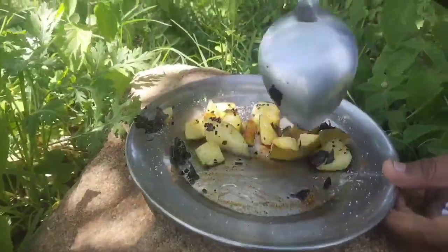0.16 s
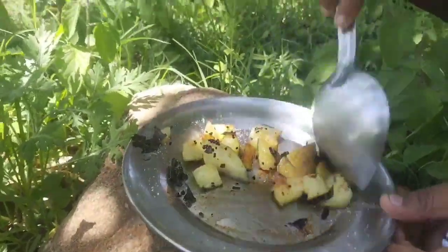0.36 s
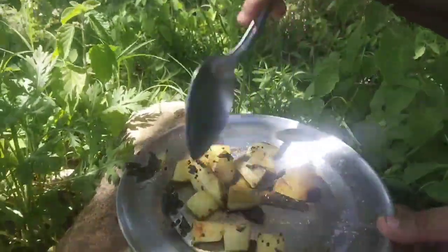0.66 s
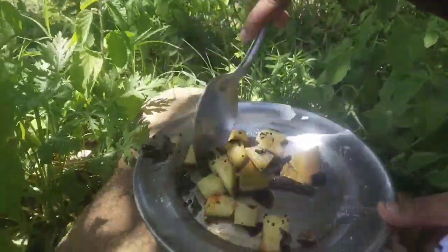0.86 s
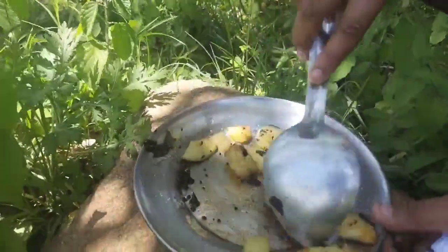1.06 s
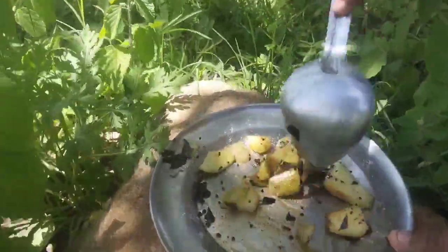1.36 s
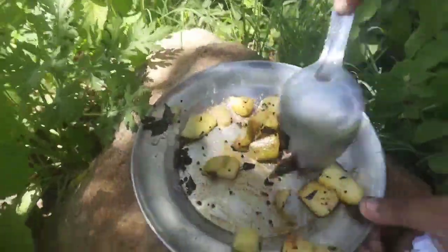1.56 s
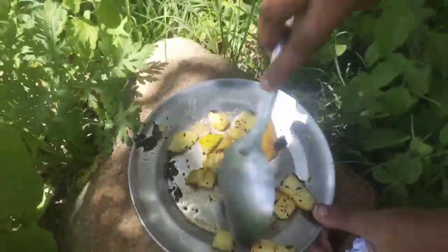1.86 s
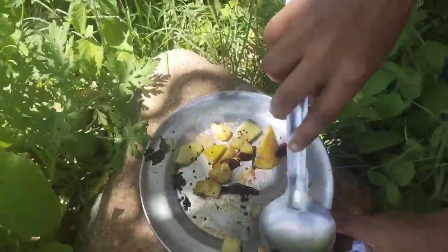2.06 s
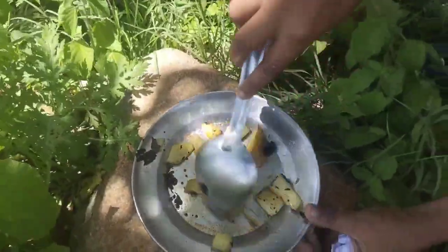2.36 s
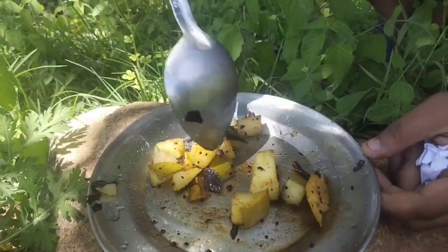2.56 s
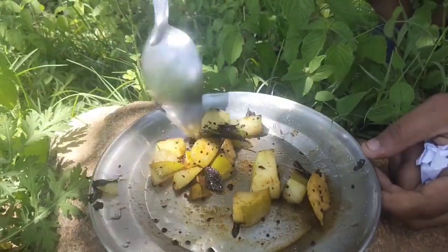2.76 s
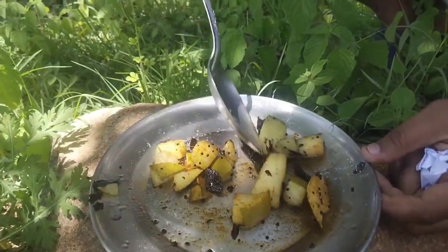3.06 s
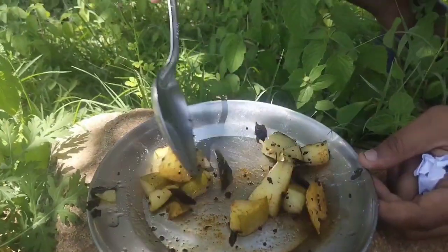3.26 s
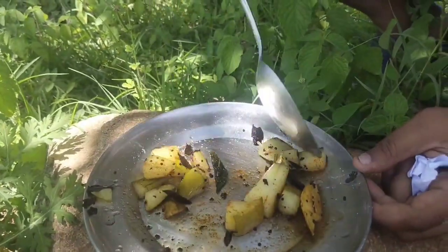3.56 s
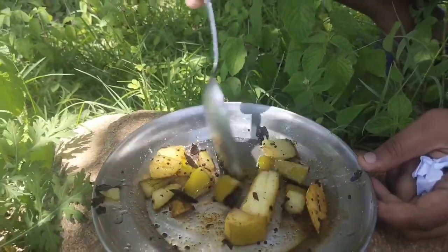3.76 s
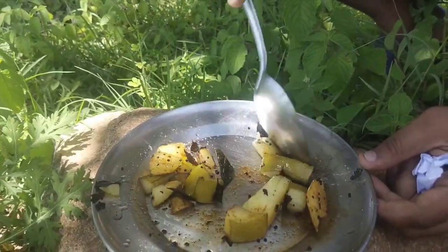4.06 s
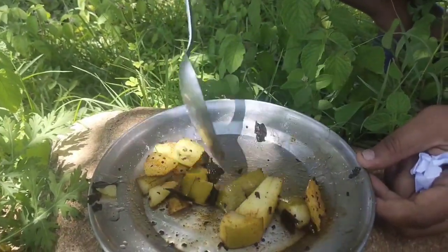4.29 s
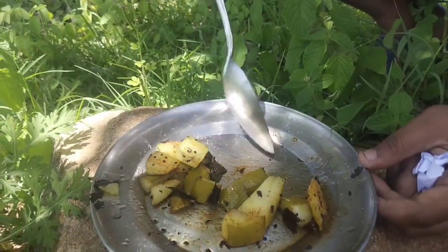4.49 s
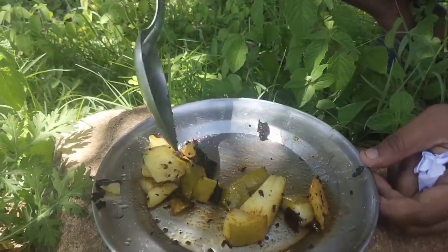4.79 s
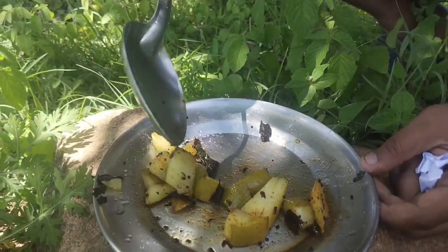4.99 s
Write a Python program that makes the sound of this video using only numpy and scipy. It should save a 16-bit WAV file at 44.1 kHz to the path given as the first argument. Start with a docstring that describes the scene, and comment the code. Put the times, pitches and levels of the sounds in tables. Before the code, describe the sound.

A metal ladle pushes cooked potato pieces onto a hand-held steel plate. An opening cluster of quick clinks and a scrape gives way to scattered knocks and rubs, then low dull bumps around two seconds and the loudest clangs just after. A longer scrape comes at three seconds, then a quiet gap and a few final taps. Close microphone outdoors, with faint bird whistles and a distant engine hum.

```python
"""Steel ladle serving onto a steel plate

A ladle serves fried potato onto a hand-held plate outdoors. Knocks and food thuds are chattering noise bursts
into a clash and decaying modes; scrapes and rubs are uneven slips through the same modes; throbbing sines
swell among them. Dull bumps, as the plate is shifted on its seat, are sagging low sines. A bird's slurred
whistles are swept sines with noise echoes; a far engine is a few wavering sines over shaped noise."""
import sys
import numpy as np
from scipy import signal
from scipy.fft import rfft, irfft, next_fast_len
from scipy.io import wavfile
from scipy.ndimage import map_coordinates

SR = 44100
rng = np.random.default_rng(int(sys.argv[2]) if len(sys.argv) > 2 else 0)


def master(y):
    """Save y as 16-bit WAV."""
    cut = np.clip(np.atleast_2d(y).T, -1, 1)
    pcm = np.round(cut * 32767)  # scale
    wavfile.write(sys.argv[1], SR, pcm.astype(np.int16))


N = 226100


def amp(db):
    """Decibels to gain."""
    return 10 ** (np.asarray(db) / 20)


def unit(x):
    """x at rms 1."""
    return x / np.sqrt(np.mean(x ** 2) + 1e-20)


def along(points, hz):
    """Interpolate (Hz, value) points on a log axis."""
    point_hz, value = np.transpose(points)
    return np.interp(np.log(hz + 1), np.log(point_hz + 1), value)


def curves(rows):
    """One value per sample for each column after the time."""
    s, *columns = np.transpose(rows)
    return [np.interp(np.arange(N) / SR, s, column) for column in columns]


def wobble(knots_per_s):
    """Smooth random curve through normal random knots."""
    knots = rng.standard_normal(int(N * knots_per_s / SR) + 4)
    return map_coordinates(knots, [np.arange(N) * knots_per_s / SR])


def filtered(x, response):
    """x times a response of frequency."""
    size = next_fast_len(len(x) + 8192)
    return irfft(rfft(x, size) * response(np.fft.rfftfreq(size, 1 / SR)), size)[:len(x)]


def coloured(x, spectrum):
    """x shaped by a (Hz, dB) spectrum, at rms 1."""
    return unit(filtered(x, lambda hz: amp(along(spectrum, hz))))


def band(x, low_hz, high_hz):
    """Causal band-pass."""
    edges_hz = [low_hz, min(high_hz, SR / 2 - 100)]
    return signal.sosfilt(signal.butter(4, edges_hz, 'band', fs=SR, output='sos'), x)


def sine(hz):
    """Sine that follows a pitch curve in Hz."""
    return np.sin(2 * np.pi * np.cumsum(hz) / SR)


def add(track, s, sound):
    """Mix a sound into the track at s; a negative s plays at 0."""
    part = track[max(round(s * SR), 0):]
    part[:len(sound)] += sound[:len(part)]


# Modes of the two steel bodies. Each row: pitch in Hz, relative level in dB, t60 in s at ring length 1.
PLATE_MODES = [(1235, -2, .06), (1380, -6, .05), (1450, -1, .09), (1485, 0, .06), (1690, -5, .06),
               (1873, -11, .07), (1935, -12, .12), (2190, 0, .08), (2522, -1, .08), (2745, -7, .05),
               (3222, -11, .09), (3558, -11, .08), (3680, -5, .05), (3805, -3, .05), (4052, -6, .11),
               (4410, -11, .12), (4710, -5, .08), (4802, -1, .06), (5217, -11, .13), (5925, -4, .09),
               (8290, 0, .07), (10005, -3, .07)]
LADLE_MODES = [(1270, -4, .08), (1685, -5, .07), (1776, -7, .06), (2212, -7, .11), (2530, 0, .1),
               (2585, -1, .09), (2870, -9, .06), (5220, -6, .1), (5930, 0, .1), (6040, -3, .07),
               (6885, -3, .08), (7635, -8, .08), (7885, -2, .08), (9078, 0, .08), (10400, -7, .08),
               (12900, -8, .07)]
RING_FLUTTER = .035  # relative pitch jitter: loose food rattles on the steel and roughens its pitch


def ring(modes, t, spread_db, detune, ring_length=1):
    """A body's answer to one touch: spot and grip change each mode's strength and pitch a little."""
    hz, db, t60_s = np.transpose(modes)[:, :, None]
    strength, shift, phase = rng.standard_normal((3, len(modes), 1))
    fade = amp(db + spread_db * strength) * np.exp(-np.log(1000) * t / (ring_length * t60_s))
    unsteady_s = t + RING_FLUTTER * np.cumsum(rng.standard_normal(len(t))) / SR
    angle = 2 * np.pi * (hz * (1 + detune * shift) * unsteady_s + phase)
    return np.sum(fade * np.sin(angle.astype('float32')), axis=0)


def nearest_mode(hz):
    """The steel mode closest to a pitch."""
    return min([*PLATE_MODES, *LADLE_MODES], key=lambda mode: abs(mode[0] - hz))


# Bands of thud, low, main and high ring, edge. Each row: low edge in Hz, high edge in Hz.
REGISTERS_HZ = [(280, 900), (900, 1900), (1900, 3200), (3200, 7000), (7000, 15500)]
# Relative dB of a plain blow. Columns: low ring, main ring, high ring, edge.
RING_DB = [-2, -0.5, 0.5, -6.5]
# dB gained per dB of brightness. Columns: low ring, main ring, high ring, edge.
RING_BRIGHTENS = [-1.1, -0.0005, 0.77, 1.0]


def blow_levels(strength_db, bright_db, thud_db, mode_hz, sing_db):
    """dB per register: brightness tilts the ring upward, the singing mode lifts its own register."""
    rings = strength_db + np.array(RING_DB) + bright_db * np.array(RING_BRIGHTENS)
    sings = np.array([low <= mode_hz < high for low, high in REGISTERS_HZ])
    return np.array([strength_db + thud_db, *rings]) + sing_db * sings


# Blows on the plate: ladle knocks, and a few dull thuds of food. Each row: start in s, relative strength in dB,
# brightness in dB, thud in dB over the strength, singing mode near Hz, lift of its register in dB,
# second mode near Hz, clarity of the modes over the clash in relative dB, relative ring length, chatter in s.
BLOWS = [(0.001, -48, 2.5, -7, 2480, 9, 6885, -2, 1.1, 0.0027),
         (0.046, -41, -3, -11.5, 2585, -2, 1270, -4.5, 1.1, 0.001),
         (0.063, -44, 0, -15, 2510, -6, 1270, -5, 0.9, 0.0025),
         (0.076, -46, 1.5, -11, 2585, 9.5, 2240, -2, 1.5, 0.0015),
         (0.085, -54.5, 13, -32, 2556, 6, 6030, 6, 1.4, 0.0016),
         (0.124, -44, -1, -32, 2520, 1, 2212, -3, 0.98, 0.0019),
         (0.1455, -47, -2.5, -17, 2585, 11.5, 2200, 0.5, 0.76, 0.0012),
         (0.474, -37, 5.5, -12, 2568, 9, 5870, -2, 0.9, 0.00074),
         (0.497, -63, 4, -21, 2590, 3, 6885, 9, 0.81, .0006),
         (0.531, -38, -1.5, -9.5, 2567, 15.5, 2212, 7.5, 1.02, 0.0016),
         (0.632, -52.5, -4.5, 9.5, 2196, 4.5, 2585, 3, 1, 0.0023),
         (0.657, -52.5, -3.5, 10, 2585, 7.5, 1685, -9, 2.3, 0.0024),
         (0.805, -62, -1.5, -23, 2585, 4.5, 1495, -2, 0.64, 0.00054),
         (0.996, -40, -2, -19, 2488, 2.5, 3222, 8.5, 0.47, 0.0038),
         (1.019, -53, -6.5, -2, 2585, 7.5, 1680, 8, 0.79, 0.0015),
         (1.0562, -50.5, 0, -23, 2490, 10, 5930, -14, .7, 0.002),
         (1.078, -61.5, 5, -20, 2585, 2, 4710, -15, .5, 0.00068),
         (1.1212, -40, -11, -34, 1776, -4.5, 1270, -1.5, 1.07, 0.0024),
         (1.152, -55, 3, -6, 2585, -1, 1685, -11, .6, 0.0012),
         (1.195, -44, 5, 3, 1667, 11, 5900, 9.5, 0.73, 0.00056),
         (1.224, -60.5, -7, 13.5, 2585, 11, 1685, -4, .7, 0.0021),
         (1.498, -64.5, -1.5, -10, 2585, -2, 4710, 8, 0.67, 0.0014),
         (1.619, -65.5, -4, -30, 1685, -15, 4080, -10, 1, 0.005),
         (1.699, -41.5, -12, -9, 1230, -10, 2585, 4, 0.39, 0.00086),
         (1.737, -60.5, 9, 14.5, 1495, 20.5, 2585, 2, 2.2, 0.0028),
         (1.994, -67, -6, 8, 3680, 8, 2760, 9, 1.3, 0.0024),
         (2.1165, -58, 0, 4.5, 3805, 0, 2745, -14, .5, 0.0015),
         (2.209, -37, -11.5, -14, 2194, 8, 1472, 10.5, 0.91, 0.0011),
         (2.2123, -39.5, 8, 3, 2208, 10.5, 8290, 6, 1.3, 0.0018),
         (2.309, -44.5, -2.5, -4, 2203, -3.5, 2585, 7, 1.2, .002),
         (2.3596, -27.5, -2, -9.5, 2513, 0.5, 1446, 6.5, 0.85, 0.0014),
         (2.3679, -32.5, -1, -6, 2496, 4, 3805, 5.5, 0.99, 0.0013),
         (2.5262, -35.5, -2.5, -18, 1935, 2.5, 4052, -2, 1.5, 0.00085),
         (2.603, -56.5, 5, -15, 5217, 5, 4052, -7, 3.55, 0.0023),
         (3.06, -52.5, -3, 9, 2522, -4, 1495, -8, .6, 0.0032),
         (3.09, -50.5, -10, 3, 2522, 7, 1700, -2, .6, 0.0024),
         (3.287, -59, 7.5, -11, 2585, -14, 4800, 3, 0.41, 0.0016),
         (3.333, -62.5, 4, -14, 2585, -11, 4710, -10, 0.83, 0.0016),
         (3.363, -64, 2.5, -2, 2585, 2, 4410, -7, 1.9, .0012),
         (3.411, -62, 0, -27, 2517, 8, 4410, 12, 1, 0.0018),
         (3.439, -74, 13, -23, 2522, 1, 5160, -3, 1.7, 0.0027),
         (3.719, -62, 3, 0, 2555, 11.5, 1920, 3, 1.1, 0.0012),
         (3.73, -59, 5, 12, 2530, 2, 1935, -2, 0.51, 0.00073),
         (3.75, -58.5, 0, 2, 2500, 9, 1935, 4, 0.8, 0.006),
         (3.894, -66, -4, -6, 2520, 2.5, 1935, 2, 1.4, 0.0034),
         (4.23, -43, 1.5, -8, 2193, 2.5, 1450, 2.5, 1.3, 0.0026),
         (4.3317, -37.5, -1, -25, 2585, 7.5, 1873, -0.5, 0.99, 0.0023),
         (4.353, -53, 6, -18, 2585, 10, 1270, -9, 0.65, 0.0019),
         (4.6449, -53.5, 4.5, 8, 2585, 13.5, 3558, 6.5, 1.6, 0.00038),
         (4.673, -45, 9, -15.5, 4052, -1.5, 3558, 0, 0.45, 0.005),
         (4.753, -58, 10.5, -16, 4000, 2.5, 4710, -3, 0.61, 0.0046),
         (5.051, -66.5, -2.5, 1.5, 2524, 13.5, 4440, 20, 1.13, 0.0019),
         (5.068, -73.5, -8.5, -4, 2530, 14, 4410, 20.5, 4.4, 0.0014)]
# Broad clash of a blow. Each row: frequency in Hz, relative level in dB.
CLASH_SPECTRUM = [(150, -31), (330, -2.5), (500, -10), (680, -12), (800, -16.5), (1000, -21), (1450, -5),
                  (1950, -24), (2600, -4), (3100, -17), (5900, -21), (6600, -27.5), (8500, -11.5),
                  (12800, -19.5), (15800, -32.5)]
PLATE_LEAD_DB, LADLE_LEAD_DB = 13.5, 15  # the singing mode's body over the other


def blows(clash_db, clash_t60_s, note_db, second_db, note_t60_s, left_db, choke_t60_s, tick, level_db):
    """Each blow chatters for milliseconds, driving a short clash and modes that food and fingers damp."""
    out, t = np.zeros(N), np.arange(SR // 5) / SR
    attack = slice(0, SR // 83)
    for (s, strength_db, bright_db, thud_db, note_hz, sing_db, second_hz,
         clear_db, ring_length, chatter_s) in BLOWS:
        # two modes sing out, and the first one's body leads
        mode = nearest_mode(note_hz)
        mode_hz, overtone_hz = mode[0], nearest_mode(second_hz)[0]
        lead_db = PLATE_LEAD_DB if mode in PLATE_MODES else -LADLE_LEAD_DB

        u = t / max(chatter_s, 1e-4)
        force = rng.standard_normal(len(t)) * np.sqrt(u) * np.exp(-u * u / 2)
        force /= np.linalg.norm(force)
        force[0] += tick

        # the sheet's many damped modes merge into a short clash
        sheet = coloured(rng.standard_normal(len(t)), CLASH_SPECTRUM) * amp(-60 * t / clash_t60_s)
        clash = signal.fftconvolve(force, sheet)[:len(t)]

        # clear modes build up during the chatter, then food and fingers choke most of their swing
        steel = amp(lead_db / 2) * ring(PLATE_MODES, t, 2, .002, ring_length)
        steel += amp(-lead_db / 2) * ring(LADLE_MODES, t, 2, .002, ring_length)
        steel *= amp(left_db) + amp(-60 * t / choke_t60_s)
        note = np.sin(2 * np.pi * mode_hz * t) + amp(second_db) * np.sin(2 * np.pi * overtone_hz * t)
        note *= amp(note_db - 60 * t / (ring_length * note_t60_s))
        build_up = 1 - np.exp(-u * u)
        blow = amp(clash_db - clear_db) * clash + build_up * (steel + note)

        # each register is levelled by its attack
        levels_db = blow_levels(strength_db, bright_db, thud_db, mode_hz, sing_db)
        for (low_hz, high_hz), db in zip(REGISTERS_HZ, levels_db):
            part = band(blow, low_hz, high_hz)
            add(out, s, amp(db + level_db) * part / np.std(part[attack]))
    return out


# Scrapes and rubs: the ladle pushed through the food, the plate shifting. Each row: start in s, rise in s,
# length in s, relative strength in dB, easing off in dB/s at fade speed 1, brightness in dB, wet fizz in dB,
# share that rings in the steel (0-1).
STROKES = [(-0.01, 0.0096, 0.21, -48, 45.5, -1, -2, 0.22), (0.457, 0.021, 0.2, -52.5, 54.5, 2.5, 1, .3),
           (0.6, 0.029, 0.028, -60.5, 113, -11.5, 21, 0.1),
           (0.733, 0.02, 0.062, -70.5, 62.5, -7.5, -8.5, .5), (0.977, 0.023, 0.34, -58, -1, -2.5, -9, .3),
           (1.172, .065, 0.38, -57.5, 67, 0.5, 3, 0.4), (1.604, 0.012, 0.17, -62.5, 28, -5, 8.5, .4),
           (1.68, 0.044, 0.18, -53.5, 51, -2.5, -3.5, 0), (1.84, 0.028, 0.56, -73, 42.5, -15, 1, 0.2),
           (2.115, .008, .06, -66, 89.5, -3.5, -1.5, 0.4),
           (2.194, 0.023, 0.072, -51.5, 46, -3.5, -2.5, 0.2), (2.367, 0.026, 0.27, -58, 9.5, -1.5, -9, 0),
           (2.29, 0.016, 0.013, -52, 120, -2, -1.5, .35), (2.576, 0.03, 0.25, -54.5, 130.5, 6, -7.5, 0),
           (2.956, 0.036, 0.053, -67.5, -1, -11.5, 4.5, .5), (2.993, 0.13, 0.29, -41, 87.5, -1, -9.5, .08),
           (3.731, 0.076, 0.11, -65, 31, 5, -5.5, .3), (4.21, 0.032, 0.23, -51, 82.5, -0.5, -7.5, 0),
           (4.292, 0.041, 0.15, -42, 427, 3, -15, 0), (4.638, 0.016, 0.028, -46, 148, 4, -12, 0),
           (4.737, 0.01, 0.14, -58.5, 126.5, -3, -1.5, 0.1)]
# Relative dB at plain brightness. Columns: body, ring, rasp, fizz.
DRAG_DB = [-1.9, -0.3, -2.5, -1.2]
# dB gained per dB of brightness. Columns: body, ring, rasp, fizz.
DRAG_BRIGHTENS = [-0.78, -0.15, 1, 0.92]
# Relative fade speed; the treble goes first. Columns: body, ring, rasp, fizz.
DRAG_FADES = [.75, .8, 1.149, 1.2]
RELEASE_DB_PER_S = 173.5  # fade once the stroke's length is over, at fade speed 1
PRESSURE_DB, PRESSURE_KNOTS_PER_S = 1.5, 49  # the push varies


def stroke_levels():
    """dB of body, ring, rasp, fizz, and the ringing share: each stroke bites in, eases off and dies."""
    power, ringing = np.zeros((len(DRAG_DB), N)) + 1e-11, np.zeros(N)
    t = np.arange(SR) / SR
    for s, rise_s, length_s, strength_db, ease_db_per_s, bright_db, wet_db, share in STROKES:
        bite = np.sin(np.pi / 2 * np.clip(t / rise_s, 0, 1)) ** 2
        fade_db = ease_db_per_s * np.maximum(np.minimum(t, length_s) - rise_s, 0)
        fade_db += RELEASE_DB_PER_S * np.maximum(t - length_s, 0)
        tops_db = strength_db + np.array(DRAG_DB) + bright_db * np.array(DRAG_BRIGHTENS)
        tops_db = tops_db + [0, 0, 0, wet_db]
        for track, top_db, speed in zip(power, tops_db, DRAG_FADES):
            push = (bite * amp(top_db - speed * fade_db)) ** 2
            add(track, s, push)
            add(ringing, s, share * push)
    levels_db = 10 * np.log10(power) + PRESSURE_DB * wobble(PRESSURE_KNOTS_PER_S)
    return levels_db, np.clip(ringing / power.sum(axis=0), 0, 1)


# Sliding friction. Each row: frequency in Hz, relative level in dB.
RASP_SPECTRUM = [(180, -35), (330, -5.5), (600, -7), (800, -8.5), (900, -10), (1150, -7.5), (1550, -2.5),
                 (2050, -6.5), (2550, 1.5), (2900, -5.5), (4400, -8.5), (5300, -6), (6600, -17),
                 (9000, -8.5), (11500, -13.5), (15800, -25.5)]
LOAD_DETUNE = .006  # share by which the moving food shifts each mode
CRUMB_DB, CRUMBS_PER_S = 22, 85  # snap size over the slips, mean rate


def scrapes(grit_db, clump_db, body_db, ring_db, rasp_db, fizz_db):
    """Steel sticks and slips over crumbs: dense uneven ticks that rasp and keep the steel ringing."""
    (body, main, rasp, fizz), share = stroke_levels()
    slips = unit(rng.standard_normal(N) * amp(grit_db * wobble(900) + clump_db * wobble(70)))
    # charred crumbs snap at random
    snaps = rng.uniform(-np.sqrt(3), np.sqrt(3), N) * (rng.random(N) < CRUMBS_PER_S / SR)
    slips = unit(slips + amp(CRUMB_DB) * snaps)

    # as the contact travels it keeps waking a different mix of modes
    rung, step = np.zeros(N), SR // 8
    t = np.arange(step) / SR
    for start in range(0, N, step):
        steel = ring(LADLE_MODES, t, 3, LOAD_DETUNE) + ring(PLATE_MODES, t, 3, LOAD_DETUNE)
        add(rung, start / SR, signal.fftconvolve(slips[start:start + step], unit(steel)))

    # a high share lets the steel ring, a low one leaves the choked rub
    rub = coloured(np.sqrt(1 - share) * slips + np.sqrt(share) * unit(rung), RASP_SPECTRUM)
    levels_db = [body + body_db, main + ring_db, rasp + rasp_db, fizz + fizz_db]
    edges_hz = [(320, 2100), (2100, 3200), (3200, 7500), (7500, 17000)]
    return sum(amp(db) * unit(band(rub, low, high)) for db, (low, high) in zip(levels_db, edges_hz))


# Tones that swell and throb: ringing steel, and faint tones of unknown source.
# Each row: start in s, length in s, centre pitch in Hz, rms at the crest in dB.
SWELLING_TONES = [(-0.006, 0.018, 2540, -38), (-0.01, 0.16, 2560, -43), (0.02, 0.2, 2212, -54),
                  (-0.01, 0.1, 5930, -55), (0.052, 0.03, 2560, -42), (1.324, 0.21, 2620, -67),
                  (1.33, 0.18, 3690, -72), (2.211, 0.028, 2190, -29.5), (2.225, 0.087, 1470, -53),
                  (2.225, 0.07, 2212, -55.5), (2.29, 0.071, 2540, -52), (2.364, 0.016, 2530, -27),
                  (2.528, 0.022, 2710, -38), (3.4, 0.14, 2522, -75), (3.52, 0.16, 1414, -81),
                  (3.786, 0.16, 1414, -72.5), (4.65, 0.095, 2585, -53), (4.78, 0.17, 2490, -71),
                  (5.047, 0.05, 1935, -64)]


def swelling_tones(waver_hz, throb_db, throb_hz):
    """Sines under a half-sine swell, wavering in pitch and throbbing unevenly in level."""
    out = np.zeros(N)
    for s, length_s, hz, db in SWELLING_TONES:
        u = np.linspace(0, 1, int(length_s * SR))
        throb = sine(throb_hz * np.exp(0.32 * wobble(throb_hz)[:len(u)]))
        tone = sine(hz + waver_hz * wobble(250)[:len(u)])
        add(out, s, np.sin(np.pi * u) * amp(db) * unit(amp(throb_db * throb) * tone))
    return out


# Dull bumps. Each row: start in s, relative level in dB, starting pitch in Hz, t60 in s.
BUMPS = [(1.913, -31.5, 242, 0.051), (1.932, -39, 127, 0.14), (2.007, -42, 141.5, 0.77),
         (2.05, -20.5, 281, 0.023), (2.063, -31.5, 168, 0.1), (2.106, -24, 129, 0.045),
         (2.119, -16.5, 244, 0.012), (2.129, -17.5, 163, 0.023), (2.164, -26.5, 124, 0.024),
         (2.29, -42, 105.7, 0.34)]


def bumps(rise_s, sag):
    """Soft knocks: a few low cycles whose pitch sags as the push lets go."""
    out, t = np.zeros(N), np.arange(SR // 4) / SR
    for s, db, hz, t60_s in BUMPS:
        tone = sine(hz * (1 - sag * (1 - np.exp(-t / t60_s))))
        onset = 1 - np.exp(-(t / rise_s) ** 2)
        add(out, s, 2 * amp(db - 60 * t / t60_s) * onset * tone)
    return band(out, 50, 710)


# Bird whistles. Each row: start in s, length in s, start pitch in Hz, end pitch in Hz, arch in Hz,
# level in dB, direct path in dB over the level.
WHISTLES = [(0.135, 0.06, 2880, 1655, 102, -54, -0.5), (0.322, 0.055, 3580, 1398, 81, -45, -1.5),
            (0.944, 0.053, 2350, 1864, 4, -62.5, -20), (1.303, 0.15, 2290, 2580, 254, -61, -16),
            (1.505, 0.122, 1690, 1930, 205, -50.5, -20), (4.101, 0.013, 1152, 1130, -4, -55.5, -7),
            (4.711, 0.12, 2344, 2210, -40, -58, -9), (5.09, 0.043, 2550, 2175, -7, -57, -1)]
FLUTTER, FLUTTER_KNOTS_PER_S = .4, 300  # relative depth and rate of the scattered sound's roughness
SMEAR_HZ = 110  # pitch spread of the scattered sound with no direct path


def bird(echo_db, echo_t60_s, scatter_t60_s):
    """Quick arched whistles; those with a weak direct path arrive mostly scattered by the leaves."""
    direct, sent = np.zeros((2, N))
    for s, length_s, start_hz, end_hz, arch_hz, db, direct_db in WHISTLES:
        u = np.linspace(0, 1, int(length_s * SR))
        pitch_hz = start_hz + (end_hz - start_hz) * u + arch_hz * np.sin(np.pi * u)
        swell = amp(db) * np.sin(np.pi * u) ** 2
        smear_hz = SMEAR_HZ * (1 - amp(direct_db)) * wobble(FLUTTER_KNOTS_PER_S)[:len(u)]
        add(sent, s, swell * sine(pitch_hz + smear_hz))
        add(direct, s, amp(direct_db) * swell * sine(pitch_hz))
    t = np.arange(SR // 2) / SR
    decay = amp(-60 * t / scatter_t60_s) + amp(-20.5 - 60 * t / echo_t60_s)
    leaves = rng.standard_normal(len(t)) * decay
    scattered = signal.fftconvolve(sent, leaves / np.linalg.norm(leaves))[:N]
    flutter = unit(1 + FLUTTER * wobble(FLUTTER_KNOTS_PER_S))
    return direct + amp(echo_db) * flutter * scattered


# Engine pitch. Each row: time in s, hum pitch in Hz.
ENGINE_PITCH = [(0.0, 90.13), (1.81, 91.7), (1.97, 89.7), (2.05, 93.73), (5.13, 89.98)]
# Engine orders. Each row: multiple of the hum pitch, relative level in dB.
HUM_ORDERS = [(1, -51), (1.25, -66.5), (1.5, -52), (2, -67.5), (2.5, -71), (3, -70)]


def engine(waver_db, level_db):
    """A far engine's low orders: sines locked to one pitch, each wavering in level."""
    pitch_hz, = curves(ENGINE_PITCH)
    phase = 2 * np.pi * np.cumsum(pitch_hz) / SR
    hum = np.zeros(N)
    for order, db in HUM_ORDERS:
        level = np.sqrt(2) * amp(db + waver_db * wobble(7))
        hum += level * np.sin(order * phase + rng.uniform(0, 2 * np.pi))
    return hum * amp(level_db)


# Distant rumble and air. Each row: frequency in Hz, relative level in dB.
OUTDOORS_SPECTRUM = [(15, -59), (25, -28), (59, -14), (82, -3.5), (141, -2), (240, -9), (390, -15.5),
                     (500, -22), (620, -28.5), (780, -50.5), (1200, -50), (2400, -51), (4000, -57),
                     (15800, -67)]


def rumble(level_db, waver_db):
    """Soft outdoor rumble and air: shaped noise wavering in level."""
    return amp(level_db + waver_db * wobble(48)) * coloured(rng.standard_normal(N), OUTDOORS_SPECTRUM)


def scene():
    """Ladle, food and plate close by, the outdoors behind."""
    struck = blows(clash_db=15.0, clash_t60_s=0.055, note_db=13, second_db=-4.5, note_t60_s=0.065,
                   left_db=-8.0, choke_t60_s=0.012, tick=0.91, level_db=-4.0)
    drag = scrapes(grit_db=1.0, clump_db=2.5, body_db=-1.73, ring_db=-3.25, rasp_db=-2.5, fizz_db=-1.2)
    tones = swelling_tones(waver_hz=25, throb_db=5, throb_hz=80)
    knocks = bumps(rise_s=0.0021, sag=0.67)
    whistles = bird(echo_db=0.5, echo_t60_s=0.66, scatter_t60_s=0.046)
    background = engine(waver_db=1.5, level_db=-5.0) + rumble(level_db=-55.0, waver_db=1.9)
    return (struck + drag + tones + knocks + whistles + background)[None]


TOP_HZ = 15900


def record(dry):
    """Cut everything from TOP_HZ up."""
    return filtered(dry[0], lambda hz: hz < TOP_HZ)[None]


dry = scene()
out = record(dry)
master(out)
```